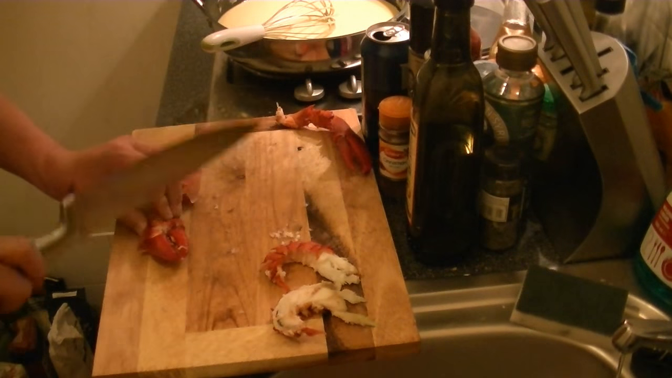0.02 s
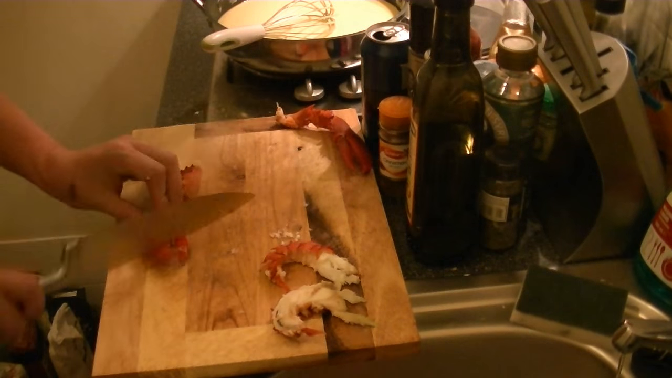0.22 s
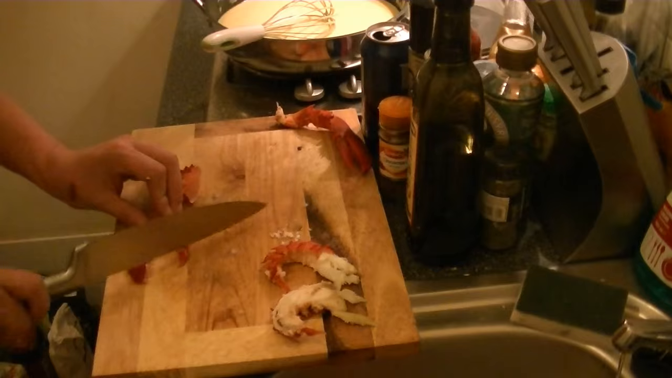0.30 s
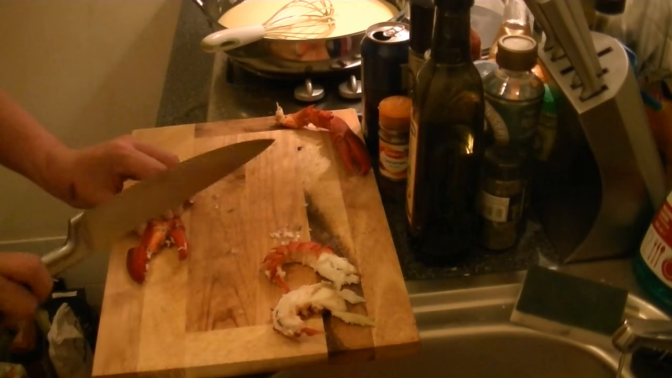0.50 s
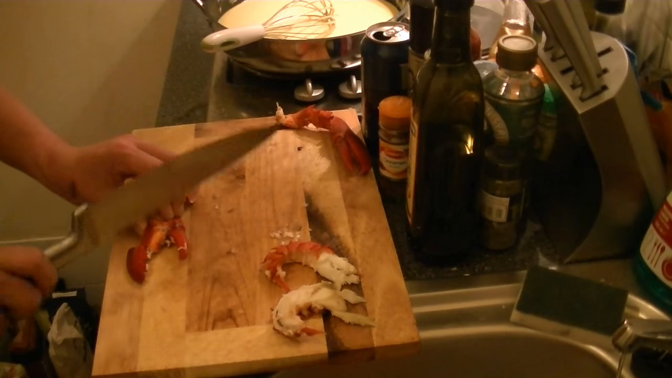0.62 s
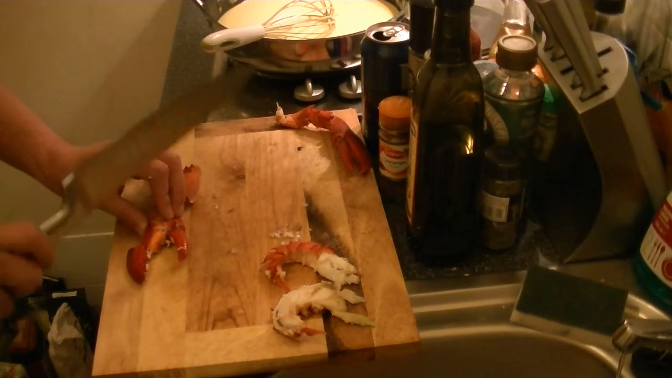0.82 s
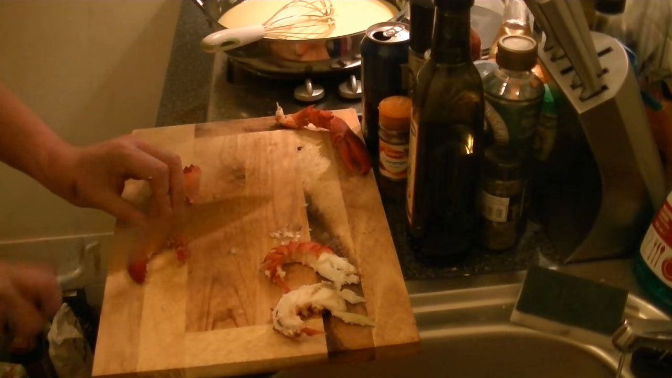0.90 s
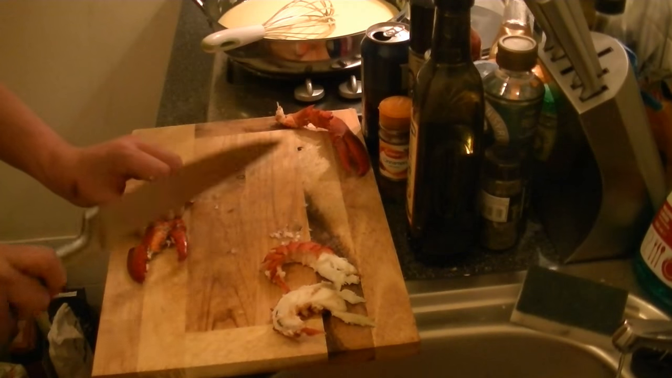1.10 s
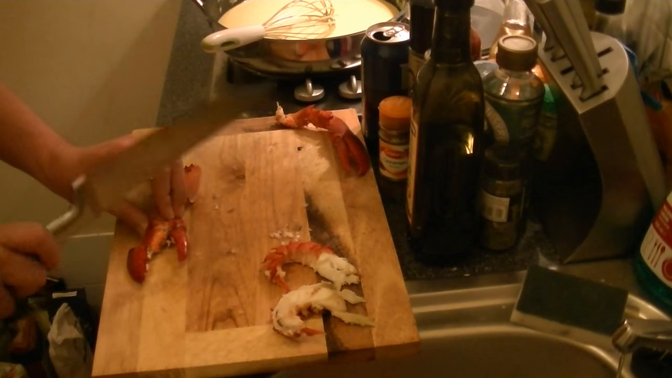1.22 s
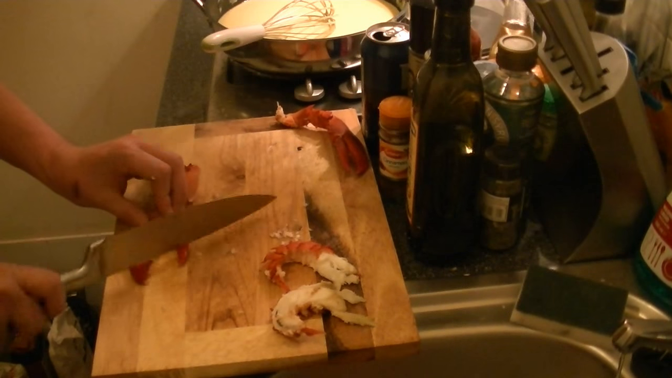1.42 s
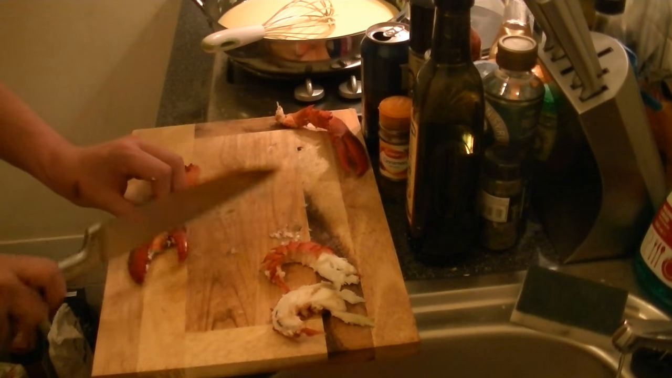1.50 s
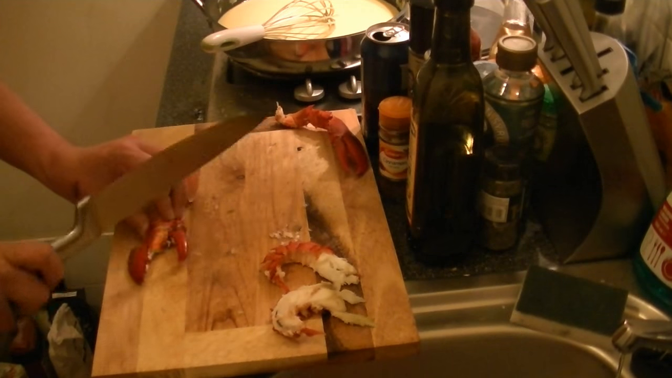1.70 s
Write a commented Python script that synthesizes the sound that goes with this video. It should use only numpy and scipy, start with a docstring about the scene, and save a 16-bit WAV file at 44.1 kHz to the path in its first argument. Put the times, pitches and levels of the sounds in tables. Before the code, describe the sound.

Loud knife knocks on a wooden chopping board crush shellfish claws, shell splinters ticking between blows

```python
"""Cracking lobster claws

The back of a heavy knife cracks lobster claws on a wooden board in a small kitchen.
Each blow is a snap, a board bang and a crunch of shell (shaped noise); counter and blade ring (sine modes).
Knife taps (modes, noise), splinter ticks and slides (noise) come in between, over quiet steady noise.
The close microphone overloads on the blows.
"""
import sys
import numpy as np
from scipy import signal
from scipy.fft import rfft, irfft, next_fast_len
from scipy.io import wavfile
from scipy.ndimage import map_coordinates

SR = 44100
rng = np.random.default_rng(int(sys.argv[2]) if len(sys.argv) > 2 else 0)


def log_audio(samples):
    """Write samples as a 16-bit WAV file to the path given in sys.argv[1]."""
    # one column per channel
    frames = np.atleast_2d(samples).T
    # limit to full scale, then quantise
    limited = np.clip(frames, -1, 1)
    pcm = np.round(limited * 32767).astype(np.int16)
    wavfile.write(sys.argv[1], SR, pcm)


N = 79380
T = np.arange(SR) / SR  # 1 s time axis of every event


def amp(db):
    """Decibels to gain."""
    return 10 ** (np.asarray(db) / 20)


def fade(t, t60):
    """Exponential decay, -60 dB at t60."""
    return np.exp(-np.log(1000) * t / t60)


def rise(tau_s):
    """Exponential approach to 1."""
    return 1 - np.exp(-T / tau_s)


def along(points, hz):
    """(f/Hz, value) points interpolated on a log-frequency axis."""
    f, v = np.transpose(points)
    return np.interp(np.log(hz + 1), np.log(f + 1), v)


def noise(gain, size=SR):
    """Noise of rms 1 coloured by a gain function of frequency."""
    spectrum = rfft(rng.standard_normal(size))
    x = irfft(spectrum * gain(np.fft.rfftfreq(size, 1 / SR)), size)
    return x / x.std()


def coloured(points, size=SR):
    """Noise of rms 1 with a (f/Hz, level/dB) spectrum."""
    return noise(lambda f: amp(along(points, f)), size=size)


def band(hz, octaves, skirt_db):
    """Noise of rms 1 in one resonance with a broad skirt."""
    def gain(f):
        away_oct = np.log2((f + 1) / hz)
        peak = np.exp(-.5 * (away_oct / octaves) ** 2)
        return peak + amp(skirt_db) / (1 + away_oct ** 2)
    return noise(gain)


def dying(x, t60s, hold_s=0):
    """After the hold, each frequency decays at its own rate."""
    hz, t, z = signal.stft(x, SR, nperseg=256)
    decay = fade(np.maximum(t - hold_s, 0), along(t60s, hz)[:, None])
    return signal.istft(z * decay, SR)[1][:SR]


def ring(modes, scatter_db):
    """Decaying sine modes with random phase, scattered level and uneven amplitude waver."""
    waver_depth, waver_hz = .55, 25
    out = np.zeros(SR)
    for hz, db, t60 in modes:
        level = amp(db + scatter_db * rng.normal())
        steps = rng.standard_normal(size=200)
        waver = 1 + waver_depth * map_coordinates(steps, [T * waver_hz], order=1)
        out += level * fade(T, t60) * waver * np.sin(2 * np.pi * (hz * T + rng.random()))
    return out


def add(out, s, x):
    """Mix x into out from time s, cropped to the scene."""
    i = round(s * SR)
    x = x[max(-i, 0):N - i]
    out[max(i, 0):][:len(x)] += x


# background spectrum: f/Hz, level/dB
FLOOR_SPECTRUM = [(25, -28), (60, -58), (100, -5.5), (200, 0.5), (450, 1.5), (680, 10), (1100, -1.5),
                  (2300, -0.5), (3500, -8), (6000, -10.5), (10000, -15.5), (15500, -28)]
FLOOR_DB = -51


def background():
    """Steady coloured noise."""
    return amp(FLOOR_DB) * coloured(FLOOR_SPECTRUM, size=N)


# slides of shell on wood: t/s, rise/s, fall t60/s, level/dB
SLIDE_EVENTS = [(0.059, 0.02, 0.25, -45.5), (0.164, 0.01, .35, -53.5), (1.699, 0.034, 0.21, -42.5)]
# slide spectrum: f/Hz, level/dB
SLIDE_SPECTRUM = [(300, -36), (1500, -7.5), (4000, -2), (9000, -3), (12000, -8), (15500, -9)]


def slides():
    """Shell sliding on the board: a light hiss with grainy level."""
    out = np.zeros(N)
    for s, rise_s, t60, db in SLIDE_EVENTS:
        grain = amp(2.5 * noise(lambda f: f < 300))  # 2.5 dB rms
        envelope = np.minimum(T / rise_s, 1) * fade(np.maximum(T - rise_s, 0), t60)
        add(out, s, amp(db) * envelope * grain * coloured(SLIDE_SPECTRUM))
    return out


# splinters of shell: t/s, level/dB, f/Hz, width/oct
SPLINTERS = [(0.548, -23.5, 2260, 0.73), (0.5902, -21.5, 7580, 0.039), (0.596, -27.5, 7300, 0.23),
             (0.627, -29.5, 1120, 0.18), (.648, -30, 2140, 0.5), (.677, -41.5, 11000, .08),
             (0.7004, -21.5, 2005, 0.12), (0.705, -32, 4640, 0.069), (0.727, -32, 2090, 1),
             (.777, -38, 6300, 0.27), (0.792, -40, 6000, 0.41), (.800, -26.5, 5220, 0.17),
             (.819, -32.5, 1880, 0.35), (0.838, -54, 2200, .6), (0.845, -37, 2000, 0.4),
             (0.93, -44, 8300, 0.23), (1.382, -34.5, 1990, .7), (1.706, -35, 1700, .8),
             (1.779, -30.5, 1650, 0.45)]
TICK_ATTACK_S, TICK_T60_S = 0.00045, 0.0084
TICK_ROOM_DB, TICK_ROOM_T60_S = -17, 0.2


def splinters():
    """Short pitched noise snaps, each with a faint room tail."""
    out = np.zeros(N)
    tail = amp(TICK_ROOM_DB) * fade(T, TICK_ROOM_T60_S)
    envelope = (fade(T, TICK_T60_S) + tail) * rise(TICK_ATTACK_S)
    for s, db, hz, octaves in SPLINTERS:
        add(out, s, amp(db) * envelope * band(hz, octaves, skirt_db=-31))
    return out


# knife lands on the claw and rocks before it breaks: t/s, level/dB
TAP_EVENTS = [(0.2295, -10), (0.2518, -21.5)]
# whole claw on the board, modes: f/Hz, level/dB, t60/s
CLAW_MODES = [(457.4, -4.5, 0.39), (522, 0, 0.19), (948, -6.5, 0.092), (1013, -4.5, 0.19), (1305, -5, .17),
              (1566, -12.5, .13), (1790, -10, 0.33), (2300, -2.5, 0.18), (2180, -11, 0.069),
              (2650, -13.5, 0.101), (3200, -18.5, .1)]
# tap noise spectrum: f/Hz, level/dB
TAP_SPECTRUM = [(100, -57.5), (250, -26), (420, -13), (1000, -10.5), (2400, -11.5), (3300, -16),
                (6000, -28.5), (15000, -47)]
TAP_NOISE_DB, TAP_NOISE_T60_S = -3.5, 0.21
TAP_ATTACK_S, TAP_LOW_CUT_HZ = .002, 300


def taps():
    """Hollow knocks on the unbroken claw: modes plus noise, bass cut."""
    out = np.zeros(N)
    for s, db in TAP_EVENTS:
        contact = amp(TAP_NOISE_DB) * fade(T, TAP_NOISE_T60_S) * coloured(TAP_SPECTRUM)
        knock = ring(CLAW_MODES, scatter_db=0.5) + contact
        add(out, s, amp(db) * knock * rise(TAP_ATTACK_S))
    return signal.sosfilt(signal.butter(3, TAP_LOW_CUT_HZ, "high", fs=SR, output="sos"), out)


SHELL_OCTAVES, SHELL_SKIRT_DB, SHELL_T60_S = 0.35, -10, .27


def shell_noise(shell_hz):
    """Broad shell resonance, as noise."""
    return band(shell_hz, SHELL_OCTAVES, SHELL_SKIRT_DB)


# kitchen reverberation spectrum: f/Hz, level/dB
KITCHEN_SPECTRUM = [(40, -46.5), (100, -22), (190, -16.5), (300, -10), (650, 6.5), (1000, 1.5), (2500, 10),
                    (4200, 4), (6300, -1), (9000, -11), (15000, -26.5)]
# kitchen decay: f/Hz, t60/s
KITCHEN_DECAY = [(100, 0.86), (600, 0.76), (2000, 0.48), (6000, 0.51), (13000, 0.46)]
KITCHEN_DB = -12.5


def kitchen(board_db, shell_db, shell_hz):
    """Room tail of board and shell; each frequency decays at its own rate."""
    echo = amp(board_db) * coloured(KITCHEN_SPECTRUM) + amp(shell_db + 2) * shell_noise(shell_hz)
    return amp(KITCHEN_DB) * dying(echo, KITCHEN_DECAY)


# short modes of the blade: f/Hz, level/dB, t60/s
BLADE_MODES = [(2613, -28, 0.13), (3070, -19, .42), (4250, -33, 0.25), (4564, -35, 0.13),
               (6160, -29.5, .28), (6352, -28, 0.57), (9500, -28.5, .28), (11950, -32, .28)]
BLADE_SWELL_S = .05
SING_HZ, SING_T60_S, SING_SWELL_S = 4500, .62, 0.11


def blade(board_db, sing_db):
    """Struck blade: short modes, and one long thin note that swells, then fades."""
    short = amp(board_db) * ring(BLADE_MODES, scatter_db=0) * rise(BLADE_SWELL_S)
    envelope = rise(SING_SWELL_S) ** 2 * fade(T, SING_T60_S)
    note = amp(sing_db) * envelope * np.sin(2 * np.pi * SING_HZ * T)
    return short + note


CHIPS_PER_S, CHIP_T60_S, CHIP_OCTAVES = 260, 0.017, 0.7


def fractures(hz):
    """Separate fractures of shell: an irregular run of tiny cracks, rms 1."""
    clicks = (rng.random(SR) < CHIPS_PER_S / SR) * rng.standard_normal(SR)
    crack = fade(T, CHIP_T60_S) * band(hz, CHIP_OCTAVES, skirt_db=-9.5)
    x = signal.fftconvolve(clicks, crack)[:SR]
    return x / x.std()


# board bang spectrum: f/Hz, level/dB
BOARD_SPECTRUM = [(40, -32.5), (100, -7.5), (190, -12), (300, -7.5), (650, 2), (1000, -2.5), (1600, 1),
                  (2400, -5), (3300, -10.5), (4200, -5), (5300, -13), (6300, -9), (9000, -20.5),
                  (15000, -34)]
# board decay: f/Hz, t60/s
BOARD_DECAY = [(100, 0.37), (600, 0.37), (2000, 0.27), (6000, 0.29), (13000, 0.13)]
# board, counter and the pans and bottles on it, modes: f/Hz, level/dB, t60/s
COUNTER_MODES = [(99.4, -33, 0.4), (248.3, -23.5, 0.49), (294.8, -23, 0.62), (332.2, -15, 0.48),
                 (456, -17.5, 0.59), (523, -29, 0.66), (627.4, -22, 0.66), (713, -15, 0.4),
                 (755, -15, 0.47), (831, -27, 0.68), (965, -16, 0.15), (1044, -20, 0.33), (1302, -20, 0.38),
                 (1480, -16, 0.19), (1598, -27, 0.58), (1800, -27, .25), (2016, -4.5, 0.16),
                 (2268, -17, 0.46), (3008, -8, 0.18)]
BLOOM_S = 0.014  # the board takes a moment to speak


def board(give, crush_s):
    """Board noise sustained through the crush, then decaying, plus counter modes."""
    bang = give * dying(coloured(BOARD_SPECTRUM), BOARD_DECAY, crush_s)
    return (bang + ring(COUNTER_MODES, scatter_db=2)) * rise(BLOOM_S)


CRUSH_DB_PER_S = 116.5
CRUNCH_DB_RMS, CRUNCH_HZ = -1, 130  # sign only flips the noise; Gaussian rolloff


def giving_way(crush_s):
    """Gain as the shell yields: falls through the crush, with uneven crunching."""
    after = np.maximum(T - crush_s, 0)
    uneven = noise(lambda f: np.exp(-(f / CRUNCH_HZ) ** 2))
    crunch = amp(CRUNCH_DB_RMS * uneven * fade(after, 0.37))
    return crunch * amp(-CRUSH_DB_PER_S * np.minimum(T, crush_s))


CHIP_DB, CHIPS_END_T60_S = -4, 0.079


def shell(give, crush_s, shell_hz, snap_hz):
    """Crushed shell: resonant noise plus fractures, both decaying after the crush."""
    after = np.maximum(T - crush_s, 0)
    body = give * fade(after, SHELL_T60_S) * shell_noise(shell_hz)
    chips = amp(CHIP_DB) * give * fade(after, CHIPS_END_T60_S) * fractures(snap_hz)
    return body + chips


SNAP_DB, SNAP_OCTAVES, SNAP_T60_S = -1.5, 0.072, 0.031


def snap(hz):
    """First split of the shell: a short resonant noise burst."""
    return amp(SNAP_DB) * fade(T, SNAP_T60_S) * band(hz, SNAP_OCTAVES, skirt_db=1.5)


# blows, the first just before the start:
# t/s, board level/dB, shell level/dB, shell f/Hz, snap f/Hz, crush/s, singing blade level/dB
BLOW_EVENTS = [(-.235, -0.5, -2.5, 3370, 3500, 0.13, -17.5), (.280, -3.5, -3.5, 3635, 3600, 0.089, -5),
               (.9638, -3, -10.5, 1320, 4120, 0.084, -15.5), (1.4042, -2.5, -7.5, 2740, 3170, 0.099, -31)]


def blows():
    """A snap, then board bang and shell crunch through the crush; counter, blade and room ring on."""
    out = np.zeros(N)
    for s, board_db, shell_db, shell_hz, snap_hz, crush_s, sing_db in BLOW_EVENTS:
        give = giving_way(crush_s)
        blow = snap(snap_hz)
        blow = blow + amp(board_db) * board(give, crush_s)
        blow = blow + amp(shell_db) * shell(give, crush_s, shell_hz, snap_hz)
        blow = blow + blade(board_db, sing_db)
        blow = blow + kitchen(board_db, shell_db, shell_hz)
        add(out, s, blow)
    return out


def scene():
    """All sources summed at one microphone, same signal in both channels."""
    mono = background() + slides() + splinters() + taps() + blows()
    return np.array([mono, mono])


CEILING, HARDNESS = .96, 6
LOW_CUT_HZ, TOP_HZ, TOP_EDGE_HZ = 25, 15850, 150


def record(dry):
    """Input saturates at the ceiling; rumble and the top of the treble are cut."""
    clipped = dry / (1 + np.abs(dry / CEILING) ** HARDNESS) ** (1 / HARDNESS)
    x = signal.sosfilt(signal.butter(1, LOW_CUT_HZ, "high", fs=SR, output="sos"), clipped)
    m = next_fast_len(N + SR)
    edge = .5 - .5 * np.tanh((np.fft.rfftfreq(m, 1 / SR) - TOP_HZ) / TOP_EDGE_HZ)
    return irfft(rfft(x, m) * edge, m)[:, :N]


dry = scene()
out = record(dry)
log_audio(out)
```